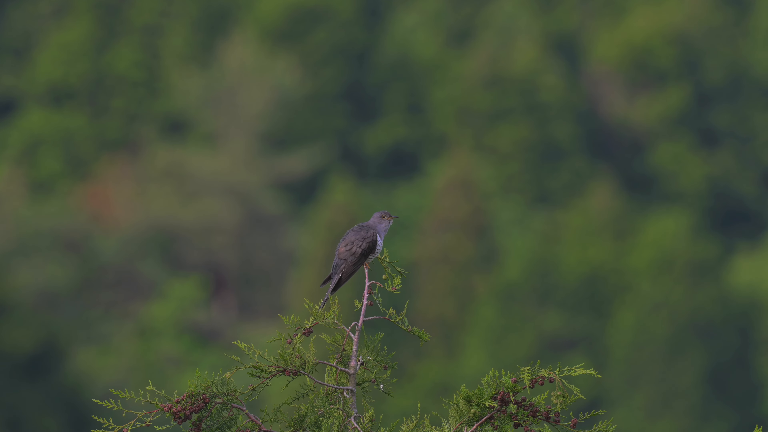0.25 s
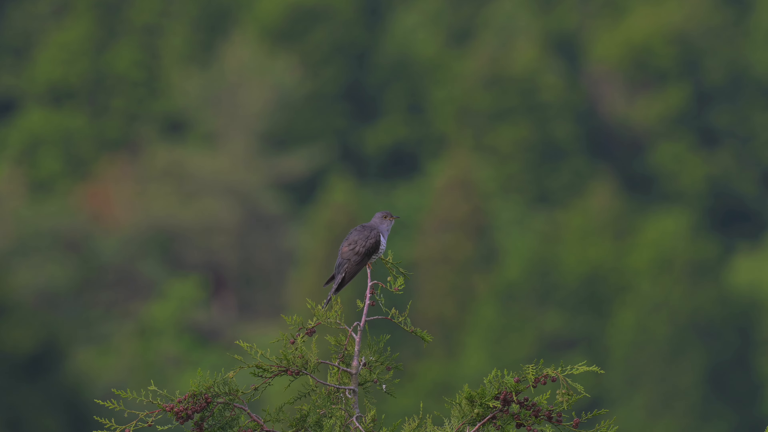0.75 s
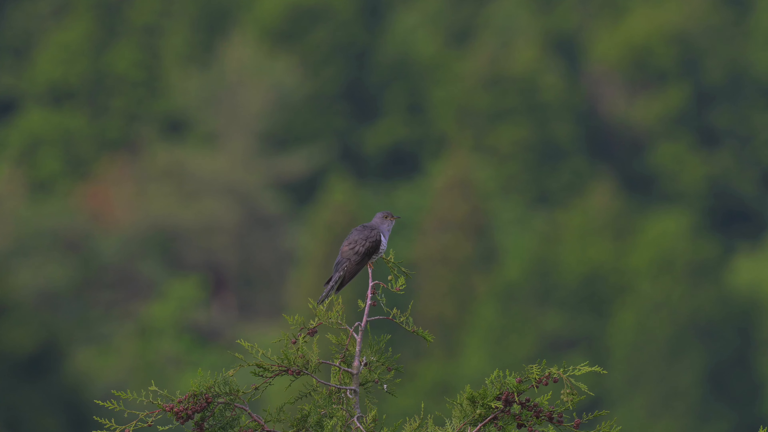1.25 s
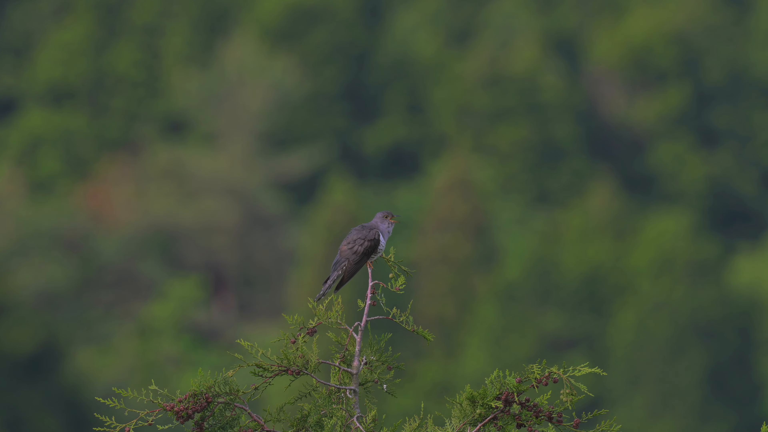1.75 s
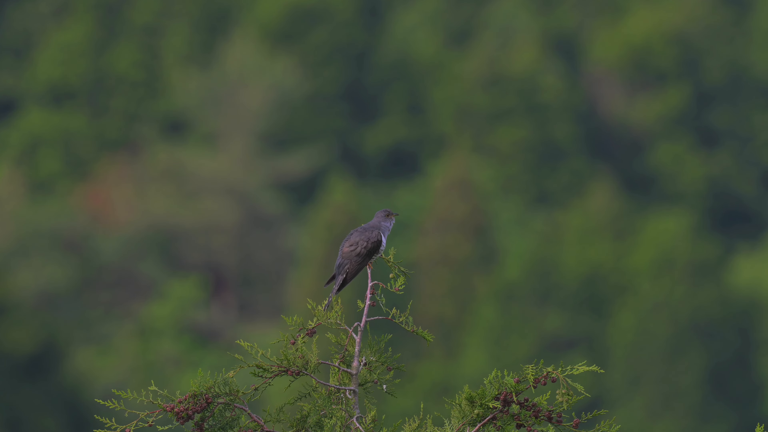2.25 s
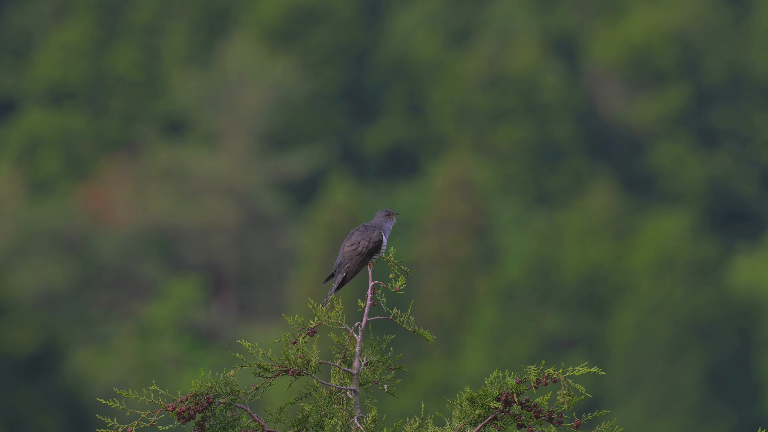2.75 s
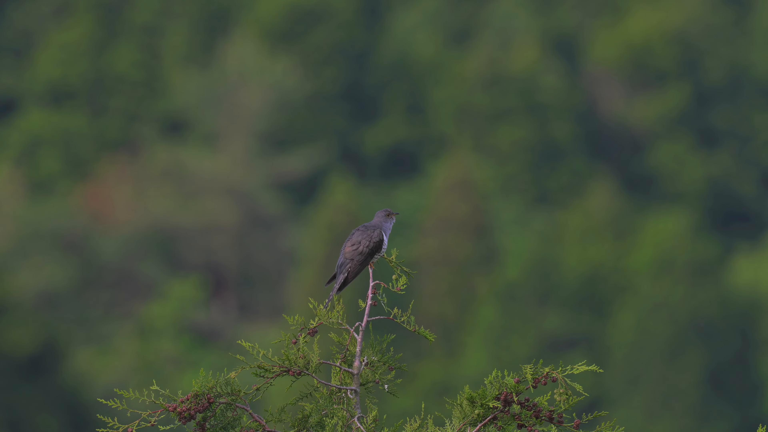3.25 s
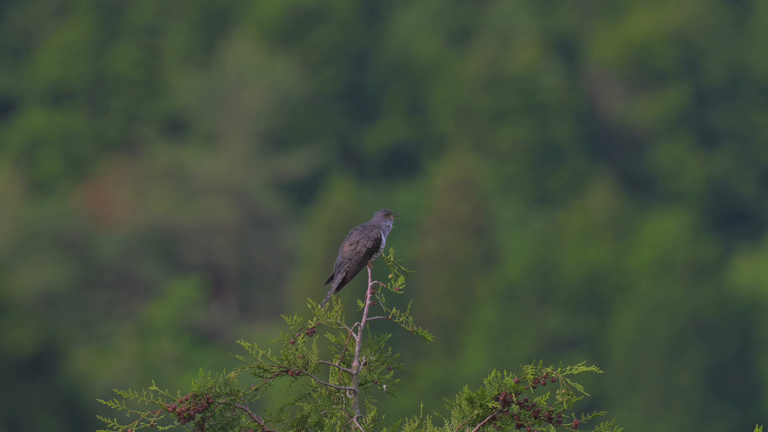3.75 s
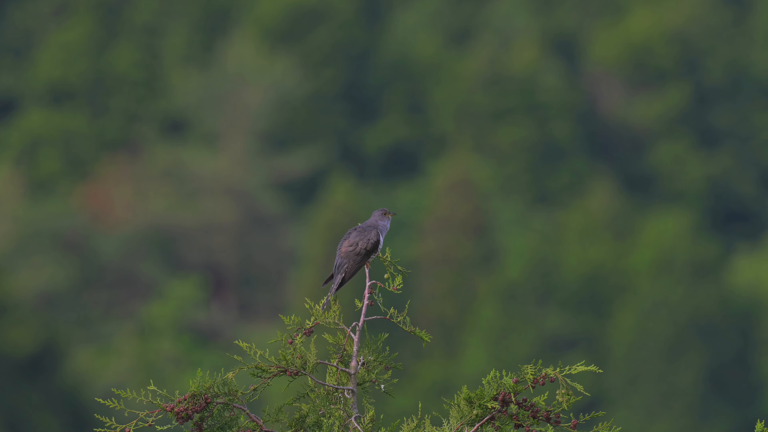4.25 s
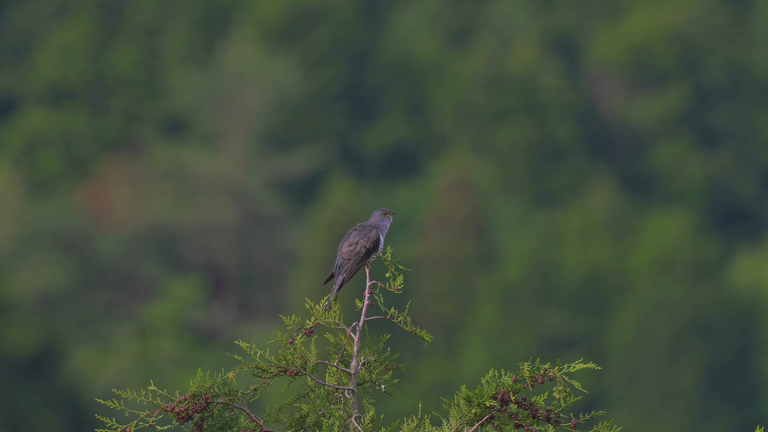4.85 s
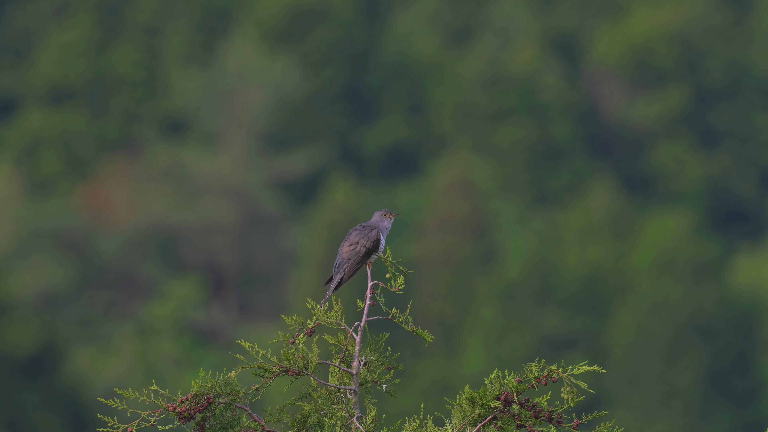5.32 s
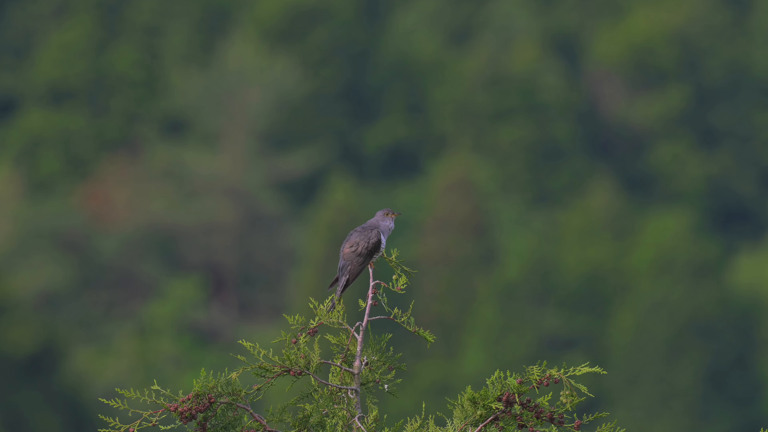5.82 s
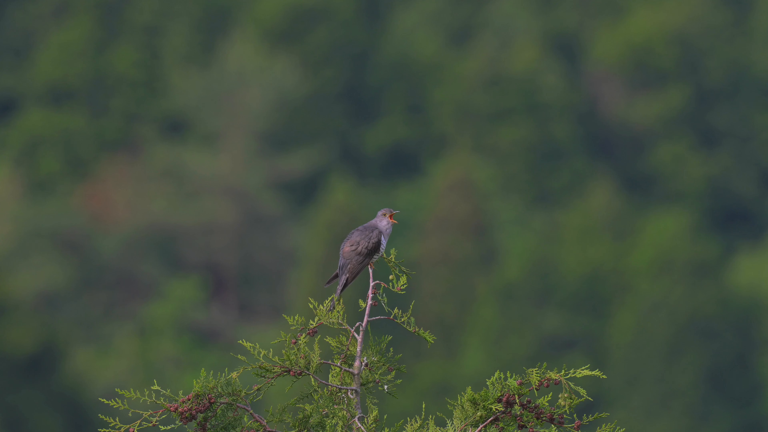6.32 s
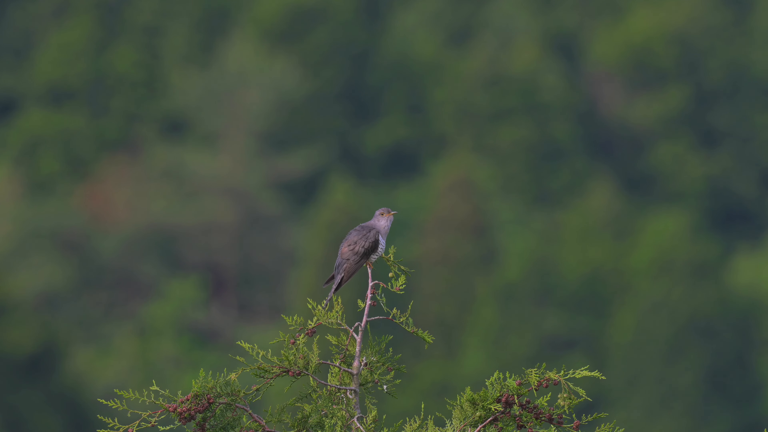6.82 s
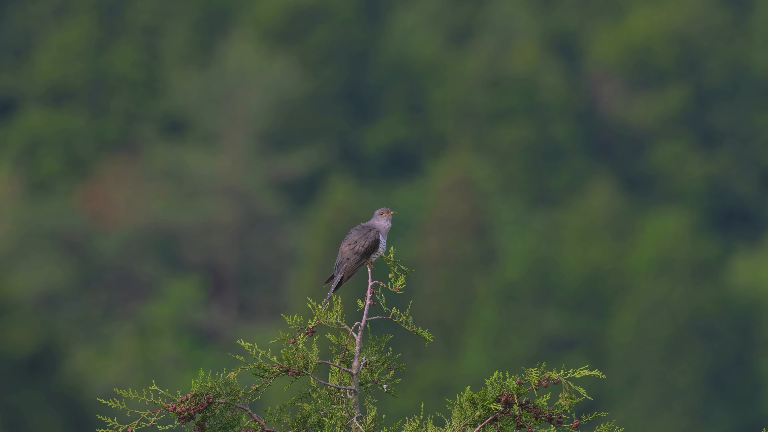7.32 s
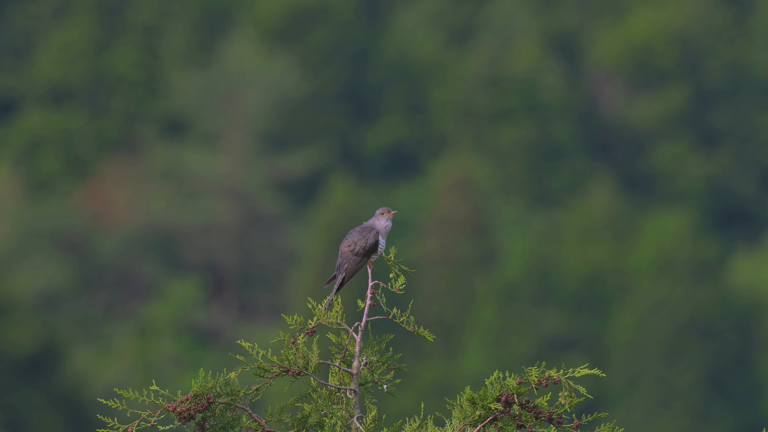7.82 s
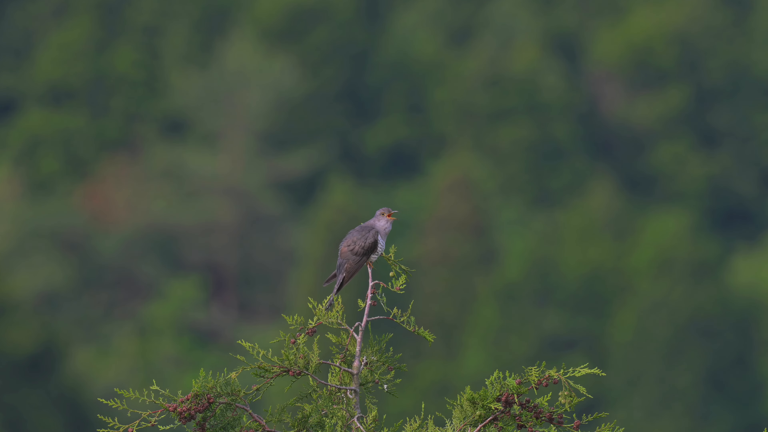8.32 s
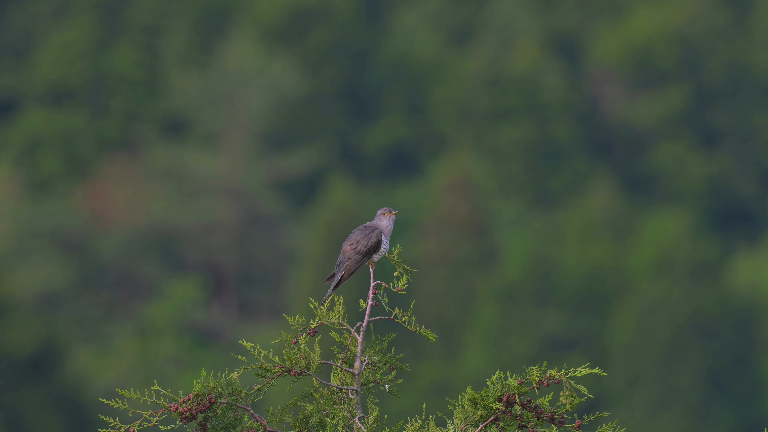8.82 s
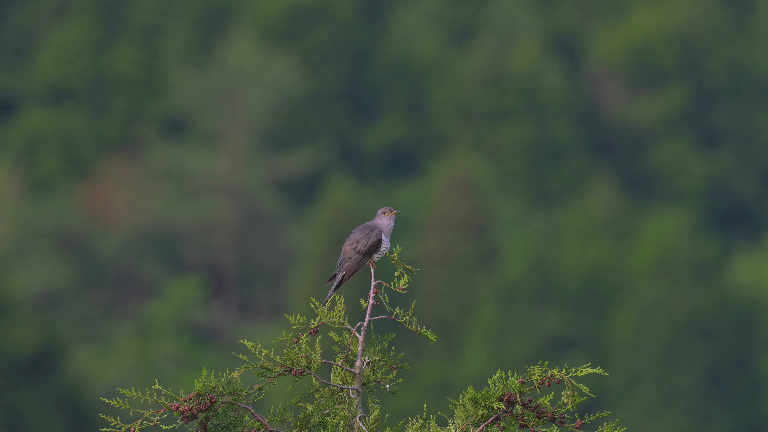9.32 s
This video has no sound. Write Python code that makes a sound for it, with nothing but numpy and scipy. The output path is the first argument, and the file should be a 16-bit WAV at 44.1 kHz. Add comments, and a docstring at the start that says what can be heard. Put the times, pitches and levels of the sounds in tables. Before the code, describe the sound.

A cuckoo on a treetop gives five phrases of brief, rounded, piping whistles, the first two alike, each later one lower. A smaller bird trills rapidly soon after the start, chirps a few times, and trills again near the end. Wooded slopes add a quick echo and a soft ringing wash. Very faint distant calls, light breeze and steady microphone hiss lie beneath.

```python
"""A cuckoo sings five phrases of short humped whistles: the first two alike, then each lower than the last.
Soon after the start a smaller bird trills, then chirps, and it trills again near the end.
Far calls, a buzz and a broad high rustle, made of bands of noise, come and go; two small dry ticks are heard.
The near birds are gliding sine tones with overtones; a wooded hillside echoes and scatters them.
Under it all lie a soft rush of air, puffs of breeze and microphone hiss, all made of coloured noise."""
import sys
import numpy as np
from scipy import signal
from scipy.fft import rfft, irfft, next_fast_len
from scipy.io import wavfile
from scipy.ndimage import map_coordinates

SR = 44100
rng = np.random.default_rng(int(sys.argv[2]) if len(sys.argv) > 2 else 0)


def to_wav(s):
    """Save 16-bit WAV."""
    ch = np.atleast_2d(s).T  # columns
    pcm = np.round(np.clip(ch, -1, 1) * 32767)  # PCM
    wavfile.write(sys.argv[1], SR, pcm.astype(np.int16))


N = 422037

REST_HZ = 1127.5  # resting pitch of the syrinx, the cuckoo's voice organ


def amp(db):
    """Decibels to gain."""
    return 10 ** (np.asarray(db) / 20)


def unit(x):
    """Scale x to an average strength (rms) of 1."""
    return x / np.sqrt(np.mean(x ** 2) + 1e-20)


def along(points, hz):
    """Read a curve of (pitch [Hz], value) points at any pitch, on a log pitch axis."""
    f, v = np.transpose(points)
    return np.interp(np.log(hz + 1), np.log(f + 1), v)


def clock(length):
    """Sample times [s] of a sound of this length [s]."""
    return np.arange(int(length * SR)) / SR


def wobble(rate, size):
    """A smooth random curve through `rate` random points a second."""
    points = rng.standard_normal(int(size * rate / SR) + 4)
    return map_coordinates(points, [np.arange(size) * rate / SR])


def filtered(x, response):
    """Multiply the spectrum of x by a response that depends on frequency."""
    n = x.shape[-1]
    m = next_fast_len(n + 8192)
    spectrum = rfft(x, m) * response(np.fft.rfftfreq(m, 1 / SR))
    return irfft(spectrum, m)[..., :n]


def noise(spectrum, shape):
    """Random noise of rms 1, coloured by (frequency [Hz], relative level [dB]) points."""
    white = rng.standard_normal(shape)
    return unit(filtered(white, lambda hz: amp(along(spectrum, hz))))


def add(track, s, sound):
    """Mix a sound into the track at time s, leaving out what falls outside."""
    at = round(s * SR) + np.arange(len(sound))
    inside = (at >= 0) & (at < N)
    track[at[inside]] += sound[inside]


def phase_of(hz):
    """Running phase of a pitch curve."""
    return 2 * np.pi * np.cumsum(hz) / SR


def cuckoo(easy_hz=2000, strain_db=-20, plunge_db=-8, plunge_speed=60000, edge=0.0044,
           linger=0.0068, build=0.016, push_db=12, effort_db=6, flutter_db=3.5):
    """Each note leaps from the syrinx's resting pitch to a crest and sinks, some with a second hump."""
    # how throat and beak colour the voice: (frequency [Hz], level [dB])
    throat = [(1100, -11), (1500, 0), (1750, -2.5), (1960, 7.5), (2150, 4), (2400, 6), (3000, -8.5),
              (3600, -4.5), (4500, -5.5), (5400, -6.5), (7000, 1.5), (8200, 13), (9800, -9.5), (11500, -1),
              (15000, -19)]
    # overtones of the voice: (multiple of the pitch, level [dB])
    overtones = [(2, -18.5), (3, -28.5), (4, -35.5), (5, -31.5), (6, -30.5), (7, -32)]
    # how hard each phrase is pushed: (start [s], overtone level [dB])
    phrases = [(-.1, 1), (1.8, 1), (3.8, -2.5), (5.8, -3), (7.6, -3)]
    # single-humped notes: (crest time [s], tail [s], crest pitch [Hz], rise from half height [s],
    # fall to half height [s], level before throat and strain [dB])
    arches = [(.006, 0.012, 2482, .018, 0.017, -26), (.158, 0.0029, 2334, 0.019, 0.028, -25.5),
              (2.507, 0.0078, 2494, 0.016, 0.016, -24), (2.666, 0.0058, 2343, .021, .023, -25),
              (4.529, 0.0088, 2340, 0.015, 0.018, -26), (4.697, 0.0042, 2210, 0.018, 0.024, -25.5),
              (6.288, 0, 1914, 0.015, 0.015, -23.5), (6.472, 0.0029, 1879, 0.0207, .019, -22.5),
              (6.648, 0.00035, 1722, 0.026, .028, -25), (8.108, 0, 1832, 0.019, 0.015, -24),
              (8.292, 0, 1820, .019, .018, -23.5), (8.470, 0, 1591, 0.025, 0.033, -26.5)]
    # two-humped and flat-topped notes: (first crest time [s], tail [s], time to second crest [s],
    # first crest [Hz], dip [Hz], second crest [Hz], first level [dB], second level [dB]),
    # levels before throat and strain
    doubles = [(1.916, 0, 0.022, 2065, 2169, 2133, -31, -32),
               (2.107, 0, .036, 2225, 2054, 2086, -30, -24.5),
               (2.318, 0.028, 0.028, 2182, 1648, 1988, -32.5, -23),
               (3.924, 0.0046, 0.021, 1910, 1934, 2021, -29, -31.5),
               (4.122, 0, 0.04, 2017, 1665, 1850, -29.5, -22.5),
               (4.340, .018, 0.028, 2102, 1406, 1812, -29.5, -22),
               (4.860, 0.0034, 0.031, 1970, 1692, 1752, -29.5, -25.5),
               (5.917, 0, .028, 1544, 1170, 1290, -28, -29.5),
               (6.101, 0, 0.037, 1870, 1250, 1416, -26, -30),
               (7.725, 0, 0.033, 1466, 1155, 1247, -31, -30.5),
               (7.917, 0, 0.043, 1795, 1224, 1343, -24, -34)]
    notes = []
    for shape, table in ((arch, arches), (double, doubles)):
        for s, tail, *row in table:
            notes.append((s, *with_tail(tail, *shape(*row))))

    track = np.zeros(N)
    for s, times, hz, levels in notes:
        force_db = [db for start, db in phrases if start < s][-1]
        knots = times - times[0]
        # the note dies out on its last pitch
        t = clock(knots[-1] + linger)
        path = glide(np.minimum(t, knots[-1]), knots, hz)
        pitch = path * (1 + .003 * wobble(462, size=len(t)))
        # the faster the pitch plunges at the end [Hz/s], the fainter the note ends
        speed = (hz[-2] - hz[-1]) / (knots[-1] - knots[-2])
        cut_db = plunge_db * (speed / plunge_speed) ** 2
        level = np.interp(t, knots, np.r_[levels[:-1], levels[-1] + cut_db])
        gate = np.clip(np.minimum(t / edge, (t[-1] - t) / linger), 0, 1)
        phase = phase_of(pitch)
        # the tone thins when forced above its easiest pitch (strain in dB per octave)
        strain = strain_db * np.maximum(np.log2(pitch / easy_hz), 0)
        tone = amp(level + strain + along(throat, pitch)) * np.sin(phase)
        # overtones are pushed early in the note and where the pitch is high
        push = push_db * (.5 - t / t[-1])
        effort = effort_db * np.log2(pitch / 2000)
        bright = level.mean() + force_db + push + effort
        # the higher an overtone, the more slowly it builds up and the sooner it dies
        swell = np.clip(np.minimum(t, t[-1] - t) / build, 1e-6, 1)
        for k, db in overtones:
            # each overtone flutters in strength on its own
            flutter = flutter_db * wobble(100.0, size=len(t))
            strength = amp(db + bright + flutter + along(throat, k * pitch))
            tone += strength * swell ** ((k - 1) / 4) * np.sin(round(k) * phase)
        add(track, s + times[0], gate * tone)
    return track


def arch(crest_hz, rise, fall, db, foot=1.65, attack_db=-14, upstroke_db=-10, downstroke_db=-1.0, release_db=-8):
    """Knots (time from crest [s], pitch [Hz], level [dB]) of a hump that swells while rising to its crest."""
    half_hz = (REST_HZ + crest_hz) / 2
    times = np.array([-foot * rise, -rise, 0, fall, foot * fall])
    hz = np.array([REST_HZ, half_hz, crest_hz, half_hz, REST_HZ])
    levels = db + np.array([attack_db, upstroke_db, 0, downstroke_db, release_db])
    return times, hz, levels


def double(gap, first_hz, dip_hz, second_hz, first_db, second_db, rise=.016, fall=.014, drop_hz=400,
           attack_db=-17, held_db=5, dip_db=-6, release_db=-14):
    """Knots of a two-humped note, as in arch(): it swells over a shallow dip and weakens in a deep one."""
    depth = abs(np.log2(second_hz / dip_hz))  # in octaves
    middle_db = (first_db + second_db) / 2 + np.interp(depth, [.035, .08], [held_db, dip_db])
    last_hz = max(dip_hz - drop_hz, REST_HZ)
    times = np.array([-rise, 0, gap / 2, gap, gap + fall])
    hz = np.array([REST_HZ, first_hz, dip_hz, second_hz, last_hz])
    levels = np.array([first_db + attack_db, first_db, middle_db, second_db, second_db + release_db])
    return times, hz, levels


def with_tail(tail, times, hz, levels, foot_hz=1282, foot_db=6, fade_db=-1):
    """The most forceful notes do not break off: they sink to a foot and run on to the resting pitch."""
    if tail < .004:  # too short to count
        return times, hz, levels
    times = np.r_[times, times[-1] + tail]
    hz = np.r_[hz[:-1], foot_hz, REST_HZ]
    levels = np.r_[levels[:-1], levels[-1] + foot_db, levels[-1] + fade_db]
    return times, hz, levels


def glide(t, knots, hz):
    """A cubic pitch path through the knots that rounds off at every crest and dip."""
    gap = np.diff(knots)
    slope = np.diff(hz) / gap
    before, after = slope[:-1], slope[1:]
    # the path is level where the pitch turns around
    turn = np.where(before * after > 0, 2 * before * after / (before + after + 1e-9), 0)
    lean = np.r_[1.45 * slope[0], turn, 1.2 * slope[-1]]
    k = np.clip(np.searchsorted(knots, t) - 1, 0, len(gap) - 1)
    u = (t - knots[k]) / gap[k]
    bend = (1 - u) * (lean[k] - slope[k]) - u * (lean[k + 1] - slope[k])
    return hz[k] + gap[k] * u * (slope[k] + (1 - u) * bend)


def small_bird(second_db=-40, flick_db=-28, flick_hz=4500, flick_s=0.0121):
    """Nearly pure slurs that swell quickly and fade; each falling one opens with a faint upward flick."""
    # single chirps, lead-ins and the first trill's last note:
    # (start [s], length [s], first pitch [Hz], last pitch [Hz], level [dB])
    chirps = [(.616, 0.068, 3530, 3510, -42.5), (1.953, 0.055, 2703, 2617, -31.5),
              (2.156, 0.062, 2860, 2956, -33), (2.834, 0.047, 3090, 3070, -33.5),
              (2.859, .026, 3200, 3400, -35), (3.084, .031, 3600, 4130, -55.5),
              (3.104, 0.021, 2970, 2250, -42), (3.113, 0.038, 2406, 2020, -37),
              (3.339, 0.033, 3160, 3230, -43.5), (3.361, 0.026, 3204, 3315, -31.5),
              (7.247, 0.058, 3260, 3270, -37.5)]
    track = np.zeros(N)
    for s, length, first_hz, last_hz, db in trill_slurs() + list(chirps):
        u = clock(length) / length
        waver = 1 + 0.014 * wobble(150.5, size=len(u))
        phase = phase_of((first_hz + (last_hz - first_hz) * u) * waver)
        swell = np.sin(np.pi * np.interp(u, [0, .4, 1], [0, .5, 1])) ** 2
        tone = np.sin(phase) + amp(second_db) * np.sin(2 * phase)
        add(track, s, amp(db) * swell * tone)
        if last_hz < first_hz:
            sweep = np.linspace(first_hz, flick_hz, int(flick_s * SR))
            add(track, s, amp(db + flick_db) * np.hanning(len(sweep)) * np.sin(phase_of(sweep)))
    return track


def trill_slurs(trill_hz=2896, sag_hz_per_s=235, opening_hz=189, settle_s=0.08,
                sweep_hz=522, narrow_s=1.26, note_s=0.0437, stretch_s_per_s=0.024):
    """Trill notes as rows like the chirps: falling slurs, lower, flatter and longer as the trill goes on."""
    # notes of the two trills: (start [s], level [dB])
    trill = [(.708, -33), (.787, -30.5), (0.863, -31.5), (0.94, -31.5), (1.017, -30.5), (1.099, -30),
             (1.176, -29.5), (1.255, -30.5), (1.346, -32.5), (1.43, -32), (1.514, -32), (1.606, -32),
             (1.702, -32), (1.815, -32), (7.369, -33), (7.448, -29), (7.524, -29.5), (7.606, -29.5),
             (7.693, -29), (7.782, -29), (7.883, -28.5), (7.984, -32), (8.075, -30), (8.172, -32.5),
             (8.286, -34.5)]
    slurs = []
    for s, db in trill:
        # time since this trill began
        age = s - min(start for start, _ in trill if s - start < 2)
        # a higher opening, then a steady sinking
        centre = trill_hz - sag_hz_per_s * age + opening_hz * np.exp(-age / settle_s)
        sweep = sweep_hz * np.exp(-age / narrow_s)
        length = note_s + stretch_s_per_s * age
        slurs.append((s, length, centre + sweep / 2, centre - sweep / 2, db))
    return slurs


def hillside(x, echo_s, echo_db, near_db, far_db, near_t60):
    """The direct sound, one bounce off the slope, scatter from near trees and the long wash of the forest."""
    # how long the forest rings: (frequency [Hz], time to fade by 60 dB [s])
    forest = [(1000, 1.16), (1400, 2.08), (2200, 1.96), (3200, 0.79), (5000, 0.61), (9000, 0.18),
              (15000, 0.04)]
    out = x.copy()
    add(out, echo_s, amp(echo_db) * x)
    hop = SR // 6
    for start in range(0, N, hop):
        # swaying foliage: the tail is drawn afresh every sixth of a second
        hz, t, z = signal.stft(rng.standard_normal(SR), SR, nperseg=256)
        fading = z * amp(-60 * t / along(forest, hz)[:, None])
        far = signal.istft(fading, SR, nperseg=256)[1][:SR]
        near = rng.standard_normal(SR) * amp(-60 * clock(1) / near_t60)
        # scattered sound starts a little late and builds up
        arrive = np.clip((clock(1) - .005) / 0.0078, 0, 1)
        tail = amp(near_db) * unit(near * arrive) + amp(far_db) * unit(far * arrive)
        tail = tail / np.sqrt(SR)
        # neighbouring pieces overlap and crossfade
        first = max(start - hop, 0)
        piece = x[first:start + hop]
        fade = np.cos(np.pi / 2 * (first + np.arange(len(piece)) - start) / hop)
        add(out, first / SR, signal.fftconvolve(piece * fade, tail))
    return out


def far_sounds(sag_per_s=0.082):
    """Many paths through the trees smear each far sound into a slightly sinking band of noise."""
    # far calls, a buzz and a broad high rustle:
    # (start [s], length [s], pitch [Hz], width [Hz], level [dB])
    far_rows = [(0.187, 0.22, 6000, 600, -71), (.25, 0.86, 4600, 720, -67), (0.905, 0.82, 5310, 1300, -71),
                (1.359, 0.42, 1077, 190, -61), (3.349, 0.15, 6270, 1600, -57.5),
                (3.529, 0.43, 1100, 186, -60), (4.853, 0.49, 7520, 3500, -69.5),
                (5.755, 0.72, 4280, 520, -72), (6.104, 0.46, 3220, 130, -68), (6.314, 1.0, 3000, 92, -66),
                (6.97, 0.17, 4480, 200, -73), (8.875, 0.24, 3140, 119.3, -67), (9.05, .69, 2910, 220, -68),
                (9.012, 0.21, 3770, 150, -66.5), (9.071, 0.32, 5040, 181, -71)]
    track = np.zeros(N)
    for s, length, pitch_hz, width_hz, db in far_rows:
        t = clock(length)
        white = rng.standard_normal((2, len(t)))
        blur = unit(filtered(white, lambda hz: 1 / (1 + (2 * hz / width_hz) ** 2) ** 0.69))
        # low-pitched noise on a sine and a cosine makes a band around the pitch
        phase = phase_of(pitch_hz * (1 - sag_per_s * (t - length / 2)))
        band = blur[0] * np.cos(phase) + blur[1] * np.sin(phase)
        add(track, s, amp(db) * np.sin(np.pi * t / length) * band)
    return track


def ticks():
    """Small dry ticks: brief bright rustles of noise that swell and fade."""
    # ticks: (start [s], length [s], level [dB])
    tick_list = [(1.299, 0.024, -56), (3.67, 0.04, -59.5)]
    track = np.zeros(N)
    for s, length, db in tick_list:
        size = int(length * SR)
        rustle = noise([(1500, -6), (5000, -11), (14000, -20)], size)
        add(track, s, amp(db) * np.hanning(size) * rustle)
    return track


def air(air_db=-60, hiss_db=-67, swell_s=3.78, swell_width_s=.16, swell_db=-63.5):
    """A gently wavering rush of air, puffs of breeze, one swell of low rush and the microphones' hiss."""
    # colour of the rush of air: (frequency [Hz], relative level per Hz [dB])
    air_colour = [(15, -39), (25, -25), (43, -16), (106, -9), (265, -1.5), (366, -7), (620, -6),
                  (816, -9.5), (958, -7), (1100, -14.5), (1780, -14.5), (2040, -18), (3380, -22),
                  (3710, -20), (6000, -27.5), (7800, -37), (13200, -120)]
    # colour of the hiss, separate left and right, dipping between 1.5 and 4.5 kHz: (frequency [Hz], relative
    # level per Hz [dB])
    hiss_colour = [(20, -9), (600, 0), (1500, -6), (4500, -7), (5800, 0), (9000, 0), (15700, -1)]
    rush = amp(air_db + 0.75 * wobble(3, size=N)) * noise(air_colour, N)
    rumble = breeze() * noise([(8, -12), (25, -18), (60, -15.5), (110, -14.5), (400, -69.0)], N)
    swell = amp(swell_db) * np.exp(-((np.arange(N) / SR - swell_s) / swell_width_s) ** 2)
    low_rush = swell * noise([(40, -11.5), (110, -6), (220, 0), (500, -23), (2000, -78)], N)
    hiss = amp(hiss_db) * noise(hiss_colour, (2, N))
    return rush + rumble + low_rush + hiss


def breeze(calm_db=-88, attack_s=0.084):
    """Strength of the breeze on the microphone: each puff rises quickly and fades back to calm."""
    # puffs: (peak time [s], fade time [s], level [dB])
    puffs = [(.03, 0.43, -66.5), (1.55, 0.35, -80), (2.4, 0.13, -70), (3.82, 0.13, -73), (4.35, .13, -68),
             (8.58, 0.1, -62), (9.26, .22, -61.5)]
    t = np.arange(N) / SR
    strength = amp(calm_db)
    for s, fade, db in puffs:
        strength = strength + amp(db) * np.exp(-np.maximum((s - t) / attack_s, (t - s) / fade))
    return strength


def scene():
    """All the birds are heard from straight ahead."""
    near = hillside(cuckoo(), echo_s=.0095, echo_db=-12, near_db=-10, far_db=-26.0, near_t60=0.29)
    other = hillside(small_bird(), echo_s=.0105, echo_db=-14, near_db=-13, far_db=-17, near_t60=.25)
    return near + other + far_sounds() + ticks() + air()


def record(dry):
    """The recorder keeps nothing above its band limit."""
    return filtered(dry, lambda hz: hz < 15780)


dry = scene()
out = record(dry)
to_wav(out)
```